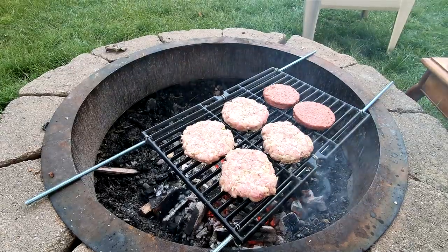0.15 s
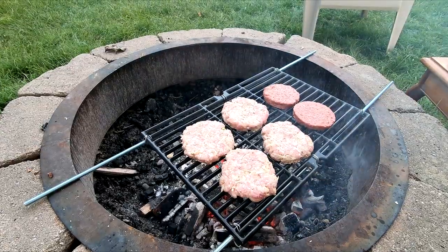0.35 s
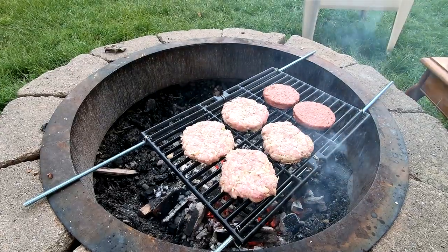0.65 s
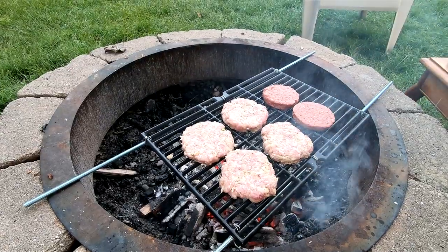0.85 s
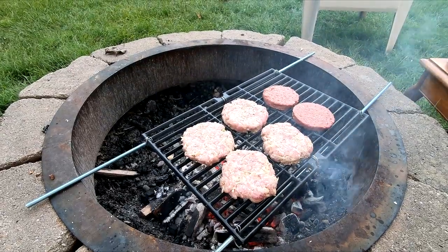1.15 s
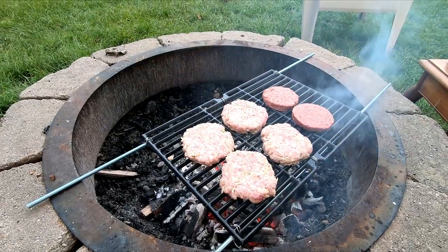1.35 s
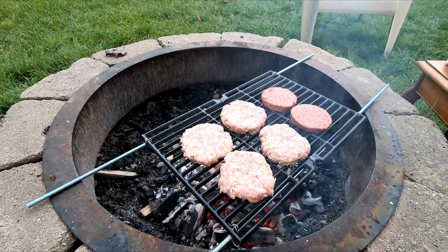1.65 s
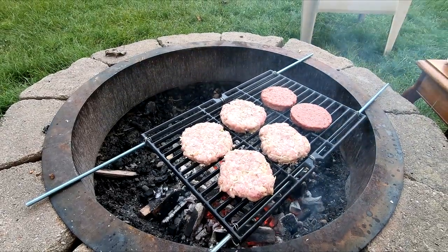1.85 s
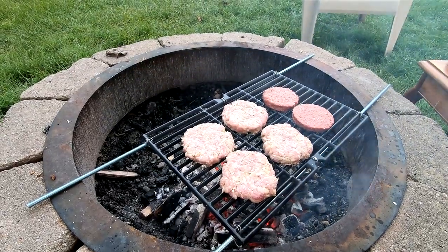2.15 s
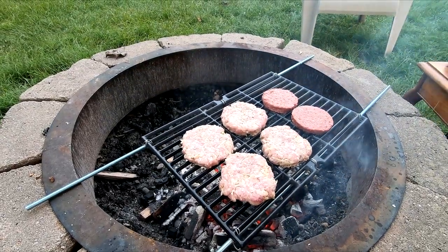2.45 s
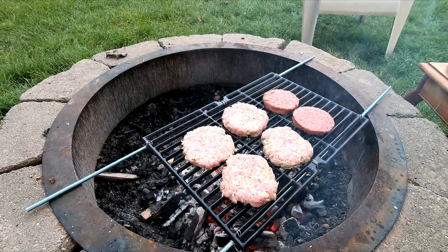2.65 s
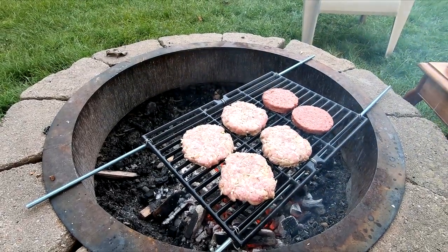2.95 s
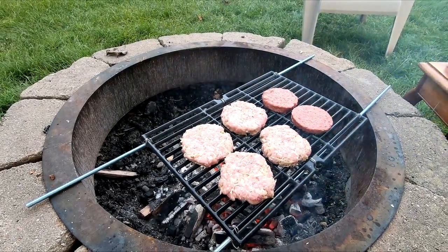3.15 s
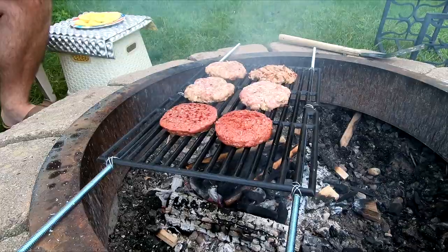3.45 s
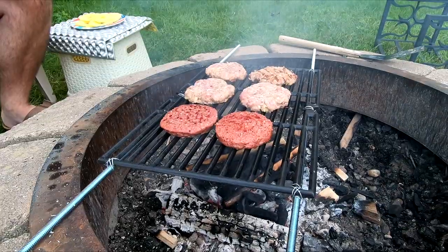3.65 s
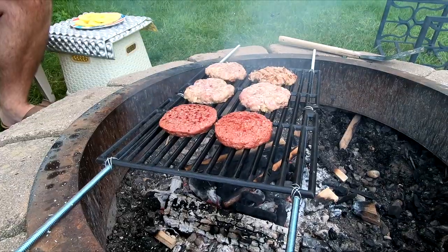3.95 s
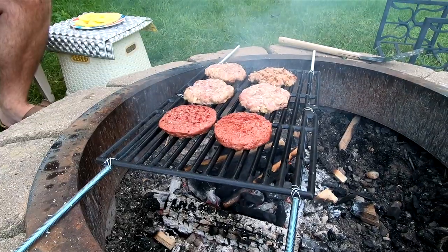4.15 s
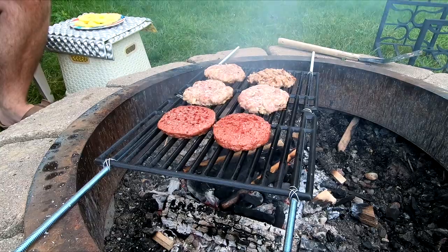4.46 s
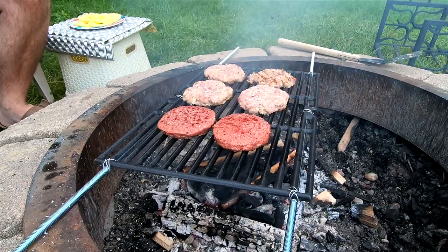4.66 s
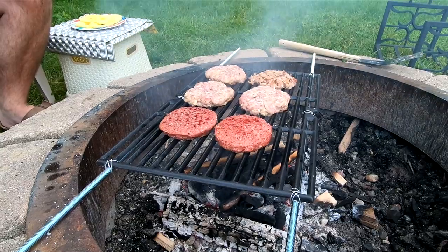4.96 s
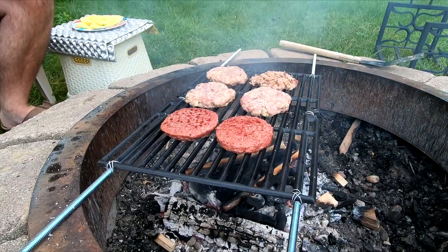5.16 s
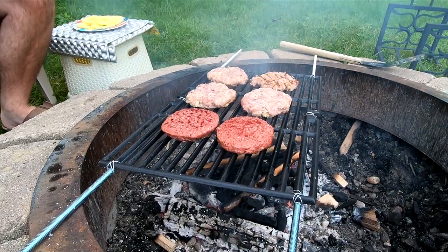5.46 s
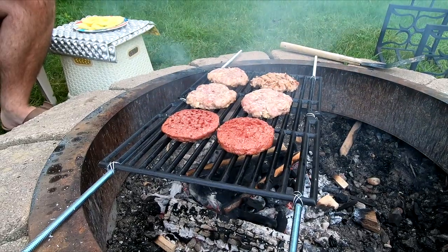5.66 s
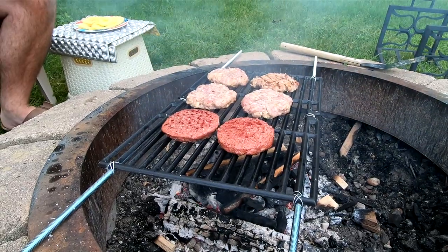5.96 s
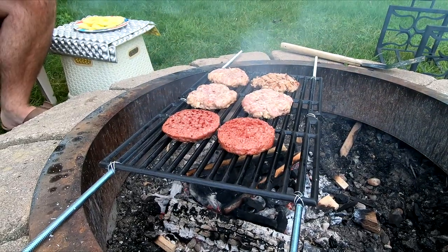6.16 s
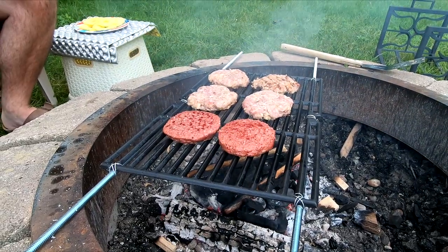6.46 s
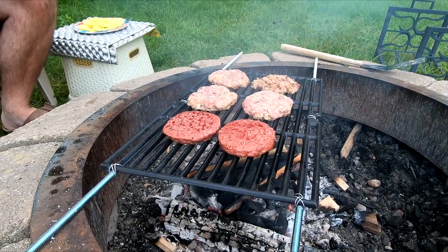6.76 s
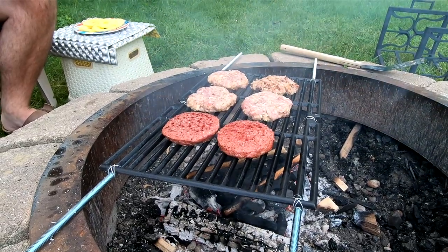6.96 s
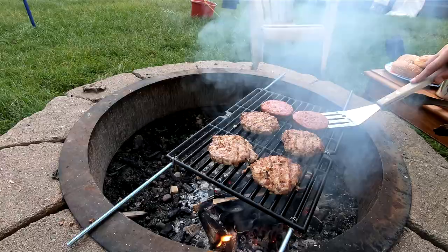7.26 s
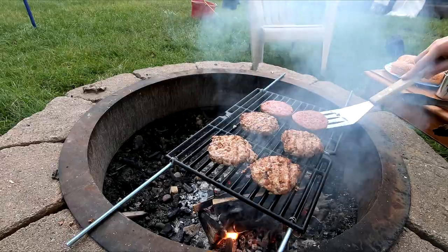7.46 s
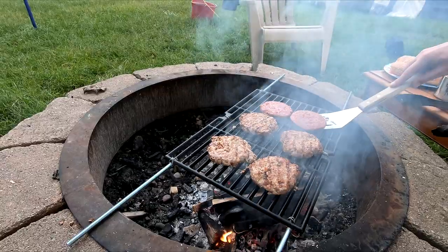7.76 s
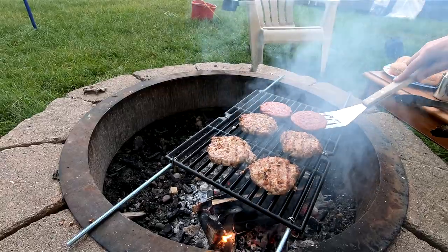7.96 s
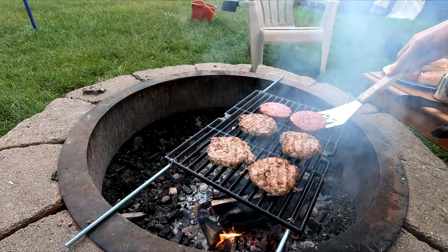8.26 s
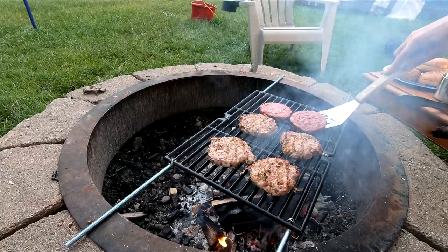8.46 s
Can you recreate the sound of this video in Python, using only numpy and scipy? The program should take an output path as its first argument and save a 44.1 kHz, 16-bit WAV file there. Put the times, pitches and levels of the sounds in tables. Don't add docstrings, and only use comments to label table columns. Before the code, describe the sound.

Close outdoor sound of patties cooking over embers. From 0 to 3.3 seconds a bright, lively sizzle surges gently, with small crisp fat pops thickening from about 1.2 seconds and a rise just before an abrupt change. From 3.3 to 7.3 seconds the sizzle is softer and slowly calms; dripped fat flares in a spitting burst around 3.5 to 3.9, and embers crack at 4.3, with a longer deep tearing crack at 5.1 and the sharpest at 5.6. Steam lifts slightly near 7. After the change at 7.3 the sizzle is quietest, and a metal spatula scrapes in short, uneven strokes, rasping and squeaking, with ringing clanks strongest near 7.7, 8.25 and 8.5. A faint high bird trills evenly from 7.35 to the end at 8.6. Low breeze buffets the microphone throughout over a dim traffic hum.

```python
import sys
import numpy as np
from scipy import signal
from scipy.fft import rfft, irfft, next_fast_len
from scipy.io import wavfile
from scipy.ndimage import uniform_filter1d

SR = 44100
rng = np.random.default_rng(int(sys.argv[2]) if len(sys.argv) > 2 else 0)


def bounce(signal):
    frames = np.transpose(np.atleast_2d(signal))
    limited = np.clip(frames, -1, 1)
    pcm = np.round(limited * 32767).astype(np.int16)
    wavfile.write(sys.argv[1], SR, pcm)


def convert_level_to_amplitude(level_db):
    exponent = np.asarray(level_db, float) / 20
    return 10 ** exponent


N = 380141

SCENE_CHANGES = [
    3.290,
    7.294,
]

# [time_s, level_db]
STEAM_LEVEL = [
    [(0.0, -60.5), (0.19, -59), (1.13, -61.5), (1.51, -59), (1.86, -59), (2.16, -58.5), (2.94, -60),
     (3.14, -58), (3.29, -55)],
    [(3.295, -62.5), (4.3, -63), (5.25, -63), (6.7, -64), (6.9, -63), (7.29, -60.5)],
    [(7.3, -64.5), (7.7, -65.5), (8.62, -66.5)],
]
# [pitch_hz, density_db]
SIZZLE_FIRST = [(880, -16), (1500, -17), (1960, -11), (2480, -12), (3010, -9.5), (3290, -12.5),
                (3810, -9.5), (4640, -11), (6680, -7), (8540, 3.5), (10700, -3.5), (14100, 1), (15700, -3)]
# [pitch_hz, density_db]
SIZZLE_LATER = [(880, -18), (1500, -22), (1770, -4.5), (2520, -5), (3070, -6.5), (3360, -4.5), (4050, -5.5),
                (5650, -3.5), (6110, -6), (8370, 0.5), (10500, -8), (13800, -5), (15700, -7)]
SPUTTER_LEVEL = [-64, -65.5, -68]
SPUTTER_FOLLOWS = 0.82

# [start_s, boil_s, level_db]
FAT_DRIPS = [
    (3.53, 0.36, -59.5),
    (4.12, .05, -67),
    (6.98, .33, -69.5),
]
# [pitch_hz, density_db]
FLARE_COLOUR = [(1300, -14.5), (1900, -6.5), (2250, -15), (2600, -8), (4200, -8.5), (4600, -0.5),
                (5000, -10.5), (5450, -3.5), (5900, -10), (6600, -14), (8000, -15), (8850, 2), (9700, -10),
                (14000, -4), (15700, -15)]

# [pitch_hz, breadth_octaves, [(start_s, peak_db)]]
FAT_POPS = [
    (13600, 0.39, [(0.3406, -28), (4.3624, -30), (5.5094, -36), (5.9968, -30.5), (6.142, -41), (7.3238, -32), (8.566, -30)]),
    (8350, 0.91, [(1.2331, -38), (1.4706, -40), (1.6601, -49), (1.7075, -32), (2.0433, -35), (2.3685, -36), (2.5416, -46), (2.6504, -33), (2.7526, -35), (3.0335, -32), (3.0584, -54), (3.683, -37), (4.0311, -30.5), (4.1669, -37), (4.2403, -33), (4.6199, -32), (5.8576, -34), (5.9314, -45), (7.3667, -44), (7.5169, -28), (7.6306, -37), (7.7823, -34), (8.0851, -30.5), (8.3834, -33), (8.4916, -41), (8.5784, -34), (8.607, -39)]),
    (4480, 0.65, [(1.2325, -40), (1.284, -39), (1.379, -40), (1.66, -36), (3.8492, -34), (3.6212, -38), (3.82, -42), (7.611, -43), (7.0284, -39), (7.1726, -44), (7.662, -36), (8.0491, -43), (8.2128, -39), (8.488, -39), (8.616, -48)]),
    (1700, 0.8, [(2.6319, -44), (3.597, -47), (3.621, -36), (7.887, -43)]),
    (950, 0.15, [(4.598, -46.5)]),
]
# [pitch_hz, breadth_octaves, boost_db]
SPIT_BANDS = [
    (4900, 0.22, 5),
    (8900, 0.15, 4),
    (12300, 0.36, 8.5),
]
# [start_s, peak_db]
SPITS_LOW = [(3.5169, -54), (3.5558, -42), (3.5853, -58), (3.5952, -52), (3.6202, -45), (3.6331, -43),
             (3.6711, -47), (3.7569, -68), (3.8746, -52), (3.903, -52), (3.9664, -54.5)]
# [start_s, peak_db]
SPITS_HIGH = [(3.5404, -45), (3.5637, -47), (3.5852, -51), (3.5962, -54), (3.6206, -46), (3.67, -48),
              (3.683, -45), (3.7064, -40), (3.7533, -46), (3.8182, -53), (3.8446, -53), (3.903, -56)]
# [start_s, peak_db]
SNAPS_HIGH = [(4.4568, -50), (4.6892, -48), (4.8135, -49), (4.8614, -49), (5.037, -56), (5.7159, -50),
              (6.0615, -46), (6.2424, -63), (6.3919, -57), (6.568, -48), (6.8704, -53), (7.1402, -52),
              (7.1726, -45), (7.2559, -48), (7.381, -44), (7.3914, -49), (7.5557, -51), (7.7019, -49),
              (7.7303, -44), (7.9059, -54), (7.9204, -47), (7.9574, -49), (7.9784, -51), (7.9894, -57),
              (8.0132, -51), (8.1814, -51), (8.3414, -49), (8.3654, -52), (8.4682, -50),
              (3.3638, -52), (3.5149, -52), (3.9689, -44), (4.3829, -47), (4.9746, -58), (5.247, -56),
               (6.2018, -56), (6.6912, -56), (6.7424, -49), (7.3424, -54), (7.3514, -47), (7.7654, -50),
               (7.7714, -52), (7.8194, -53), (8.1489, -54), (8.2726, -50), (8.3154, -52)]

# [start_s, peak_db, tear_s, tear_against_ring_db, low_edge_hz]
EMBER_CRACKS = [
    (3.334, -39, .002, -8, 3000),
    (4.1132, -38, .002, 1, 7000),
    (4.2828, -27.5, 0.0015, 0, 2900),
    (5.0646, -24, 0.0056, 10, 710),
    (5.6175, -19.5, 0.0026, -2, 3840),
    (6.9534, -34, .0015, 0, 8000),
]
# [pitch_hz, level_db, t60_s]
EMBER_MODES = [
    [(4700, -4, 0.024), (9850, -3, 0.033), (13600, -4, .015)],
    [(9000, -14, 0.032), (10800, -13, .015), (13500, -7, .01)],
    [(3850, -5.5, 0.008), (4500, -8, 0.007), (6840, -9, 0.0062), (9450, -1, 0.013)],
    [(900, -21, 0.017), (1597, -3.5, 0.046), (2350, -14, .02), (2900, -13, 0.03), (3720, -3.5, 0.046),
     (4610, -1, 0.052), (5350, -14, .03), (6100, -5.5, 0.11), (6200, -10, .05), (6420, -11, .015),
     (8150, 3, 0.033), (8650, 2, 0.022), (15240, -7, .025)],
    [(3040, -14, 0.046), (3840, -6, 0.03), (4600, -17, 0.02), (5070, -13, 0.022), (6230, -3, 0.027),
     (8050, -2, 0.013), (8730, 0.5, 0.011), (10900, -12, .01), (12400, -5, 0.01), (13500, -12, .01),
     (14300, -13, .01)],
    [(11200, 1, 0.013), (13000, -6, .01)],
]

# [start_s, length_s, pressure_db, edge_bite_db]
SPATULA_STROKES = [(7.274, 0.03, -49, 1.5), (7.366, 0.027, -54.5, 3.5), (7.461, 0.082, -45.5, -1),
                   (7.567, 0.1, -59, -3.5), (7.701, 0.058, -50, 3), (7.887, 0.06, -59.5, 2.5),
                   (8.069, 0.081, -56, 0.5), (8.219, 0.066, -48, 2), (8.359, 0.059, -55, 4),
                   (8.463, 0.018, -45.5, -4.5), (8.487, 0.028, -47.5, 1), (8.59, .04, -64, 5.5),
                   (7.3, 0.54, -65, 0), (7.85, 0.68, -67.5, -1.5)]
STROKE_ANSWERS = {"long": (-1.9, 0.5, 1.29, 1.5, 189), "short": (-3.5, 1, 1.25, 1, 269),
                  "blade": (-11.5, 2.1, 0, 1, 400), "rasp": (-4.5, 0.98, 0.54, 2, 416),
                  "fizz": (-8.5, 1.9, 3, 1, 355)}
# [start_s, long_bars_db, short_bars_db]
BLADE_CATCHES = [(7.305, -49, -56), (7.365, -44, -45), (7.383, -37.5, -45), (7.44, -48, -50),
                 (7.476, -50, -49), (7.5105, -34.5, -41), (7.5205, -52, -33.5), (7.608, -38, -45),
                 (7.655, -55, -60), (7.705, -45, -56), (7.712, -27, -56), (7.738, -53, -35.5),
                 (7.933, -60, -55), (8.073, -50, -57), (8.118, -45, -42), (8.219, -56, -42),
                 (8.227, -36, -44), (8.2495, -26, -31.5), (8.260, -31, -41), (8.286, -35, -47),
                 (8.468, -38, -45), (8.478, -33, -49), (8.497, -30, -34.5)]
CONTACT_MOVES = [
    7.445,
    7.69,
    7.772,
]
# [pitch_hz, then level_db at each of four contact places]
LONG_BAR_MODES = [(298, -16, -18.5, -34, -17.5), (449.7, -5.5, -5.5, -4.5, -4.5),
                  (520, -17, -12.0, -25.5, -13), (563, -10.5, -16, -26, -13), (614, -11, -12, -10, -9.5),
                  (671, 0, -0.5, 0, -0.5), (734.6, -3, 3, -5, -7), (761.5, -2.5, 1, -4, -3),
                  (847, -10, -18.5, -16, -15), (905, -12, -18, -27, -17), (1002, -22, -23, -10, -19),
                  (1060, -8, -9, -15.0, -7.5), (1119, -8, -7, -18, -9)]
# [pitch_hz, then level_db at each of four contact places]
SHORT_BAR_MODES = [(1410, -2, -7, -6, -7), (1525, -10, -9, -2, -5), (1910, -3, -7, -8, -8.5),
                   (2038, -5, 5, -12, -1), (2127, -0.5, -5, -7.0, -2), (2188, -0.5, 1.5, -9, -4),
                   (2277, -3, -10, 2, -4.5), (2310, -9, -7, -13, -6.5), (2490, -3, -18, -9, -11),
                   (2590, -4.5, -17, -13, -16), (2696, -7, -6, -4, -4.5), (2910, -3, -5.5, -21, -6.5),
                   (3126, -14, -15, 1, -6), (3240, -7.5, -24, -6, -6)]
# [pitch_hz, then level_db at each of four contact places]
BLADE_MODES = [(4000, 3, 0, -4, -15), (4550, -7, 5, 0, -4), (4720, -6.0, -6, -7, -5),
               (5500, -7, -1, -2.5, -3), (6180, 1, -9, -2.5, -3.5), (6690, 3, -7, -3.5, -3.5),
               (7460, -1, -8, -5, -8), (8400, -11, -11, -4, -6), (8500, -8, -10, -1, -6),
               (8950, -4, -4, -4, -4), (9500, 1, -0.5, -4, -3)]
# [pitch_hz, density_db]
RASP_COLOUR = [(250, -13), (700, 4), (1300, -0.5), (1750, -4.5), (2300, -1.5), (3500, -1.5), (5000, -3),
               (7000, -5.5), (10000, -6.5)]
# [pitch_hz, density_db]
FIZZ_COLOUR = [(7000, -4), (9000, -1), (11000, -10), (14000, 3), (15700, -4)]
# [start_s, length_s, pitch_hz, level_db]
SQUEAK_EVENTS = [(3.336, 0.011, 13500, -60), (4.118, .025, 8900, -58), (4.12, .02, 12500, -62),
                 (4.692, .01, 13500, -58), (4.82, .014, 13800, -60), (4.87, .02, 13500, -64),
                 (5.115, .007, 7250, -61), (5.512, .012, 13700, -58), (7.37, .02, 15300, -60),
                 (7.372, .02, 12000, -67), (7.475, .035, 4700, -57), (7.505, 0.012, 4500, -61),
                 (7.52, .03, 13200, -63), (7.525, .02, 7640, -56), (7.635, .015, 13000, -66),
                 (7.72, 0.018, 10100, -64), (7.74, .025, 8500, -55.5), (7.742, .025, 4500, -57.5),
                 (7.745, .02, 6300, -56), (7.746, .02, 12400, -60), (8.1, .02, 15300, -66),
                 (8.115, 0.027, 4500, -64), (8.118, 0.021, 9000, -59), (8.13, .016, 5600, -66),
                 (8.24, 0.027, 4570, -54), (8.25, .025, 8800, -55), (8.255, 0.013, 9500, -57),
                 (8.258, .02, 6100, -56), (8.262, .025, 5500, -59), (8.285, 0.023, 4500, -60),
                 (8.372, .015, 9000, -57), (8.378, 0.037, 4700, -57), (8.387, .012, 13600, -60),
                 (8.412, .025, 4500, -61), (8.492, .015, 8800, -56), (8.492, .02, 5570, -60),
                 (8.497, 0.014, 4720, -54), (8.497, .015, 14800, -65), (8.56, .01, 13400, -63)]

# [first_note_s, period_s, edge_hz, top_hz, level_db, first_notes_swell_db]
BIRD_TRILL = (7.338, .0648, 6856, 7344, -57.5, -8)

# [time_s, level_db]
BREEZE_PUSH = [(0.0, -34), (0.62, -51), (0.86, -34), (1.32, -41.5), (1.53, -28.5), (2.16, -46.5),
               (2.28, -34.5), (4.05, -42), (4.27, -48.5), (4.34, -38), (4.82, -30), (4.94, -45),
               (6.31, -37.5), (6.51, -49.5), (7.37, -32.5), (8.09, -46), (8.62, -33)]
# [pitch_hz, density_db]
PUSH_COLOUR = [(1.5, -14), (5, 0), (10, -2), (18, -19), (25, -20.5), (36, -30.5), (44, -31), (55, -42)]
# [opening_pressure, closing_pressure, reach_s]
END_PRESSURE = (-.015, .033, .03)
# [pitch_hz, density_db]
TRAFFIC_COLOURS = [
    [(30, -51), (45, -9), (65, -7.5), (125, -2.5), (150, -3.5), (190, -16), (240, -11.5), (340, -16),
     (470, -23.5), (700, -20), (1600, -24.5), (2100, -35)],
    [(30, -41), (45, 4), (65, -1.5), (109, 1.5), (138, -2.5), (173, -4.5), (258, -8), (323, -12.5),
     (456, -16.5), (700, -16.5), (1600, -19.5), (2100, -36)],
]
# [pitch_hz, width_hz, level_db]
WHINE = (710, 12, -85)


def rms_one(x):
    return x / np.sqrt(np.mean(x ** 2) + 1e-20)


def in_time(rows):
    s, *columns = np.transpose(rows)
    return [np.interp(np.arange(N) / SR, s, c) for c in columns]


def at_hz(points, hz):
    pitch, db = np.array(points, float).T
    return np.interp(np.log(np.maximum(hz, .1)), np.log(pitch), db)


def colour(x, spectrum, low_hz=0, high_hz=20000):
    size = next_fast_len(N)
    hz = np.fft.rfftfreq(size, 1 / SR) + 1e-3
    edges = 1 / np.sqrt((1 + (low_hz / hz) ** 12) * (1 + (hz / high_hz) ** 12))
    shaped = rfft(x, size) * convert_level_to_amplitude(at_hz(spectrum, hz)) * edges
    return rms_one(irfft(shaped, size)[:N])


def drift(rate_hz):
    step, settle = 40, 2000
    r = np.exp(-2 * np.pi * rate_hz * step / SR)
    white = rng.standard_normal(N // step + settle + 2)
    slow = signal.lfilter([1], [1, -2 * r, r * r], white)[settle:]
    return np.interp(np.arange(N) / step, np.arange(len(slow)), rms_one(slow))


def resonate(x, hz, width_hz):
    r = np.exp(-np.pi * width_hz / SR)
    w = 2 * np.pi * hz / SR
    return signal.lfilter([0, np.sin(w)], [1, -2 * r * np.cos(w), r * r], x + 1e-18)


def clicks(per_s, spread_db):
    sizes = convert_level_to_amplitude(spread_db * np.minimum(rng.exponential(1, N), 4.5))
    signs = rng.choice([-1, 1], N)
    return sizes * signs * (rng.random(N) < per_s / SR)


def burst(decay_s):
    t = np.arange(2000) / SR
    return rng.standard_normal(2000) * np.exp(-t / decay_s)


def add(out, s, db, sound):
    i = round(s * SR)
    sound = sound[:N - i]
    out[i:i + len(sound)] += convert_level_to_amplitude(db) * sound / np.abs(sound).max()


def swell(s, length, db, rise_db, fall_db, top=.5, arch_db=0.):
    step = 16
    t = np.arange(0, N + step, step)[:, None] / SR - s
    inside = np.clip(t, 0, length)
    rise = rise_db * np.minimum(t, 0)
    fall = fall_db * np.maximum(t - length, 0)
    arch = arch_db * (2 * (inside / length - top)) ** 2
    level_db = np.maximum(db + rise - fall - arch, -200)
    gain = np.sqrt((convert_level_to_amplitude(level_db) ** 2).sum(axis=1))
    return np.interp(np.arange(N) / step, np.arange(len(gain)), gain)


def sizzle():
    steam_db, = in_time(sum(STEAM_LEVEL, []))
    place = np.searchsorted(SCENE_CHANGES, np.arange(N) / SR)
    mean_db = np.array([steam_db[place == k].mean() for k in range(3)])[place]
    sputter_db = np.array(SPUTTER_LEVEL)[place] + SPUTTER_FOLLOWS * (steam_db - mean_db)

    bubbles = rms_one(clicks(5000 * convert_level_to_amplitude(3 * drift(25)), spread_db=4.0))
    flutter = convert_level_to_amplitude(0.74 * drift(10.0) + 0.75 * drift(79))
    white = (0.53 * bubbles + 0.88 * rng.standard_normal(N)) * flutter
    patches = convert_level_to_amplitude(1.2 * drift(6.2) + .8 * drift(20.5))
    finest = signal.butter(2, 10000, "high", fs=SR, output="sos")

    first = place == 0
    out = 0
    for spectrum, heard in ((SIZZLE_FIRST, first), (SIZZLE_LATER, ~first)):
        sputter = convert_level_to_amplitude(sputter_db) * colour(white, spectrum, high_hz=6000)
        steam = convert_level_to_amplitude(steam_db) * colour(white, spectrum, low_hz=6000)
        steam = steam + (patches - 1) * signal.sosfilt(finest, steam)
        out = out + heard * (sputter + steam)
    return out


def flare():
    boil = swell(*np.transpose(FAT_DRIPS), rise_db=400, fall_db=35)
    boil = boil * (np.arange(N) < SCENE_CHANGES[1] * SR)

    def drops():
        spits = rms_one(clicks(600 * convert_level_to_amplitude(4.8 * drift(30)), spread_db=4.0))
        return spits + 0.72 * rng.standard_normal(N)

    big, small = drops(), drops()
    low = colour(big, FLARE_COLOUR, high_hz=7000)
    high = colour(small + 0.61 * big, FLARE_COLOUR, low_hz=7000)
    return boil * convert_level_to_amplitude(-1.0) * (low + 0.87 * high)


def pops():
    out = np.zeros(N)
    spits = []
    for (hz, octaves, boost_db), rows in zip(SPIT_BANDS, (SPITS_LOW, SPITS_HIGH, SNAPS_HIGH)):
        spits.append((hz, octaves, np.add(rows, [0, boost_db])))
    for hz, octaves, rows in FAT_POPS + spits:
        wide = 2 ** np.clip(octaves, .1, 2)
        band = signal.butter(2, [hz / wide, min(hz * wide, 19000)], "band", fs=SR, output="sos")
        for s, db in rows:
            add(out, s + 0.0014, db - 6.0, signal.sosfilt(band, burst(0.00091)))
    return colour(out, [(300, -14)] + SIZZLE_LATER[2:]) * out.std()


def embers():
    out, snap = np.zeros(N), signal.unit_impulse(2000)
    dull = signal.butter(2, 9800, fs=SR, output="sos")
    thin = signal.butter(1, 2480, "high", fs=SR, output="sos")
    tear_band = np.vstack([dull, thin])
    for (s, db, tear_s, tear_db, low_hz), modes in zip(EMBER_CRACKS, EMBER_MODES):
        ring = sum(convert_level_to_amplitude(d) * resonate(snap, hz, np.log(1000) / np.pi / t60) for hz, d, t60 in modes)
        tear = convert_level_to_amplitude(tear_db) * signal.sosfilt(tear_band, burst(tear_s))
        low_edge = signal.butter(6, low_hz, "high", fs=SR, output="sos")
        add(out, s, db, signal.sosfilt(low_edge, ring + tear))
    return out


def ticks():
    sizes = np.abs(clicks(per_s=18, spread_db=1.5))
    snaps = signal.lfilter([1], [1, -.93], sizes) * rng.standard_normal(N)
    high = signal.butter(3, 12000, "high", fs=SR, output="sos")
    return convert_level_to_amplitude(-55) * signal.sosfilt(high, snaps)


def bars(modes, drive, place, width_hz, widening, wander_db):
    table = np.array(modes)
    total = np.sqrt((convert_level_to_amplitude(table[:, 1:]) ** 2).sum(axis=0).mean())
    t = np.arange(len(drive)) / SR
    out = 0
    for k, (hz, *db) in enumerate(table):
        w = width_hz + widening * hz
        wander = np.interp(t, np.linspace(0, t[-1], 40), rng.standard_normal(40))
        strength = convert_level_to_amplitude(np.array(db)[place] + wander_db * wander) / total
        out = out + (-1) ** k * resonate(drive * strength, hz, w) * np.sqrt(4 * np.pi * w / SR)
    return out


def spatula():
    start = round(SCENE_CHANGES[1] * SR)
    s, length, pressure_db, bite_db = np.transpose(SPATULA_STROKES)
    gains = {}
    for part, (step_db, share, top, arch_db, fall_db) in STROKE_ANSWERS.items():
        level_db = pressure_db + step_db + share * bite_db
        gains[part] = swell(s, length, level_db, 1400, fall_db, top, arch_db)[start:]

    slips = rms_one(clicks(1500 * convert_level_to_amplitude(3 * drift(40)), spread_db=3.0)) + 0.4 * rng.standard_normal(N)
    rub = slips + 2.1 * rng.standard_normal(N)
    dry = gains["rasp"] * colour(rub, RASP_COLOUR, 180, 10500)[start:]
    dry += gains["fizz"] * colour(rub, FIZZ_COLOUR, 9000)[start:]

    slips = slips[start:]
    place = np.searchsorted(CONTACT_MOVES, np.arange(start, N) / SR)
    knocks = np.zeros((2, N - start))
    for s, *db in BLADE_CATCHES:
        knocks[:, round(s * SR) - start] = convert_level_to_amplitude(np.array(db) + 12.0)

    long_drive = slips * gains["long"] + knocks[0]
    short_drive = slips * gains["short"] * convert_level_to_amplitude(-2.5) + knocks[1]
    grate = bars(LONG_BAR_MODES, long_drive, place, width_hz=14.0, widening=0.004, wander_db=1.5)
    grate += bars(SHORT_BAR_MODES, short_drive, place, width_hz=10.5, widening=0.005, wander_db=2.5)
    blade = bars(BLADE_MODES, slips * gains["blade"], place, width_hz=30.0, widening=0.022, wander_db=4.0)
    return np.pad(grate + blade + dry, (start, 0))


def squeaks():
    out = np.zeros(N)
    for s, length, hz, db in SQUEAK_EVENTS:
        width_hz = .022 * hz
        air = resonate(rng.standard_normal(3000), hz, width_hz)
        air = resonate(air, hz, 2 * width_hz)
        shape = np.hanning(round(1.4 * length * SR))
        add(out, s - .7 * length, db + 6.5, shape * air[-len(shape):])
    return out


def bird():
    first, period, edge_hz, top_hz, db, swell_db = BIRD_TRILL
    note_s = .021
    out, u = np.zeros(N), np.linspace(0, 1, round(note_s * SR))
    for k, (detune, accent) in enumerate(rng.standard_normal((20, 2))):
        arch = np.sin(np.pi * u ** .8)
        hz = (edge_hz + (top_hz - edge_hz) * arch) * (1 + .004 * detune)
        note = np.sin(2 * np.pi * np.cumsum(hz) / SR) * np.sin(np.pi * u)
        add(out, first + k * period - note_s / 2, db + 1.4 * accent + swell_db * np.exp(-k / 2), note)
    return out


def breeze():
    eddy_hz, eddy_db, eddy_follows = 14.2, -54.5, 0.23
    push_db, = in_time(BREEZE_PUSH)
    air = rng.standard_normal(N)
    push = convert_level_to_amplitude(push_db) * colour(air, PUSH_COLOUR, high_hz=eddy_hz)
    eddies_db = eddy_db + eddy_follows * (push_db - push_db.mean())
    push += convert_level_to_amplitude(eddies_db) * colour(air, PUSH_COLOUR, eddy_hz, 78.4)

    t, (opening, closing, reach) = np.arange(N) / SR, END_PRESSURE
    push += (opening - push[0]) * np.exp(-t / reach) + (closing - push[-1]) * np.exp((t - t[-1]) / reach)
    return push


def traffic():
    rumble = rng.standard_normal(N)
    first, later = [colour(rumble, spectrum, low_hz=40.5) for spectrum in TRAFFIC_COLOURS]
    heard = np.where(np.arange(N) < SCENE_CHANGES[0] * SR, first, later)
    hum = convert_level_to_amplitude(-61 + 1.45 * drift(8.6)) * heard
    hz, width_hz, db = WHINE
    return hum + convert_level_to_amplitude(db) * rms_one(resonate(rng.standard_normal(N), hz, width_hz))


def scene():
    fire = sizzle() + flare() + pops() + embers() + ticks()
    scrape = spatula() + squeaks()
    return (fire + scrape + bird() + breeze() + traffic())[None]


def top_cut(x):
    return signal.sosfilt(signal.butter(12, 16510, fs=SR, output="sos"), x)


def record(dry):
    t = np.arange(N) / SR
    fades = np.prod([np.clip(np.abs(t - s) / .006, .1, 1) for s in SCENE_CHANGES], axis=0)
    slow = uniform_filter1d(dry, 800)
    faded = slow + (dry - slow) * fades
    cut = signal.ellip(10, .5, 38, 15750, fs=SR, output="sos")
    top = signal.cheby2(16, 60, 16750, fs=SR, output="sos")
    both = np.vstack([cut, top])
    running = signal.sosfilt_zi(both)[:, None] * faded[0, 0]
    mix, _ = signal.sosfilt(both, faded, zi=running)
    return top_cut(mix)


dry = scene()
out = record(dry)
bounce(out)
```